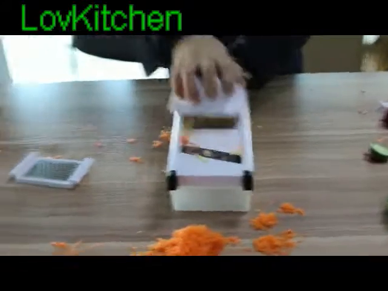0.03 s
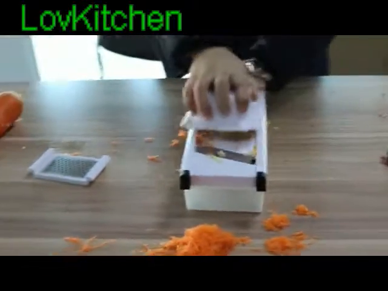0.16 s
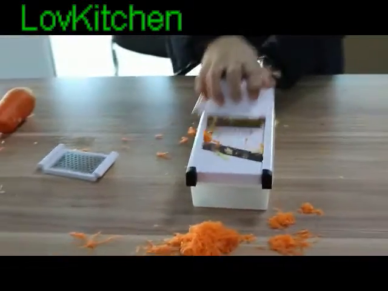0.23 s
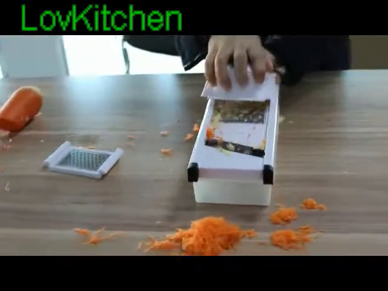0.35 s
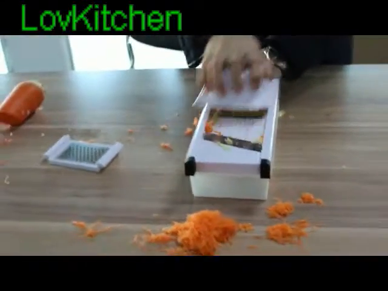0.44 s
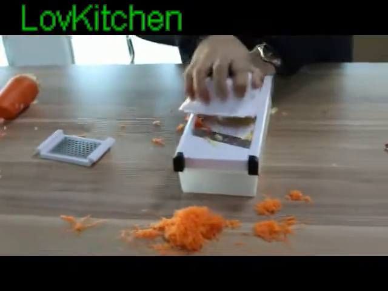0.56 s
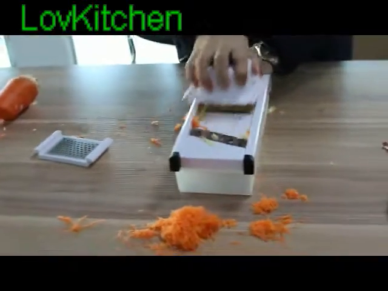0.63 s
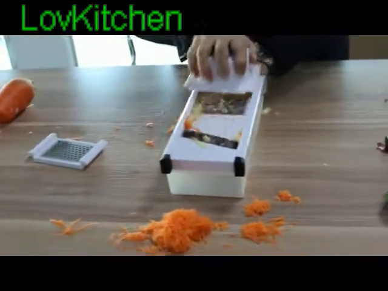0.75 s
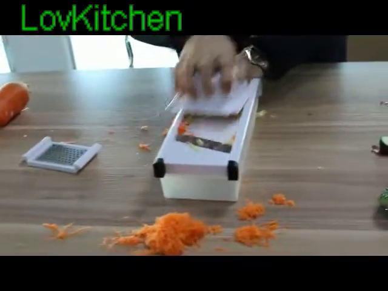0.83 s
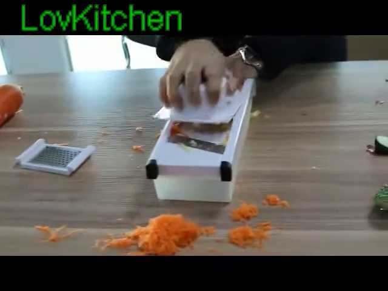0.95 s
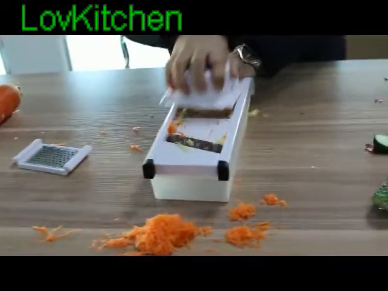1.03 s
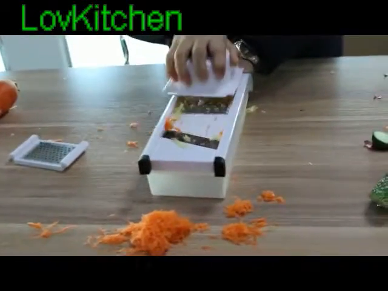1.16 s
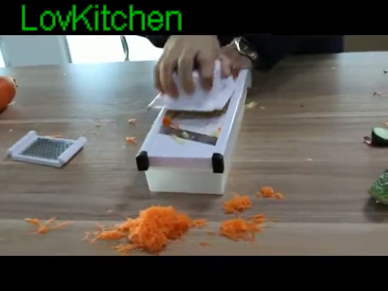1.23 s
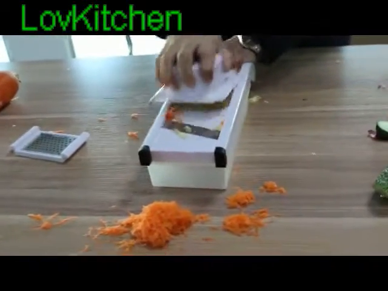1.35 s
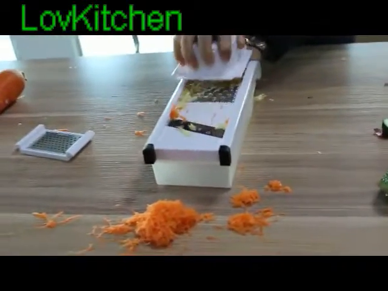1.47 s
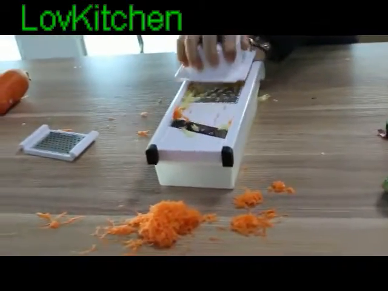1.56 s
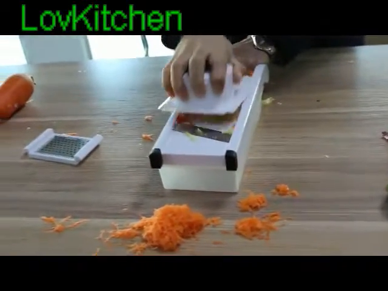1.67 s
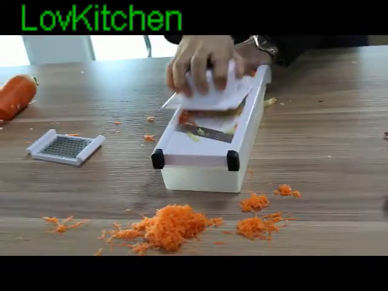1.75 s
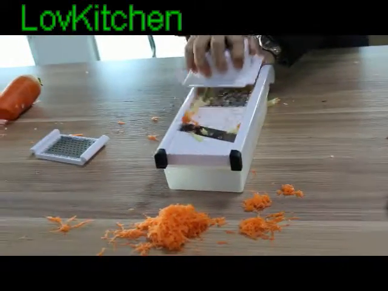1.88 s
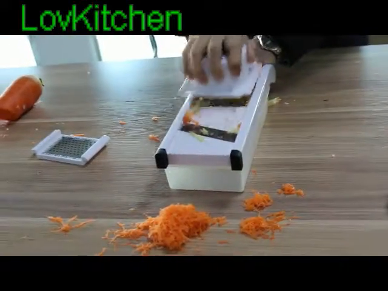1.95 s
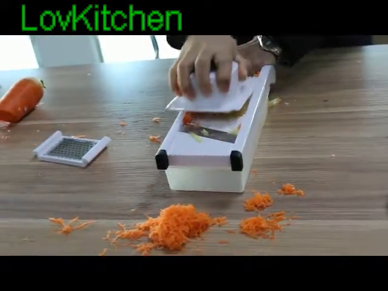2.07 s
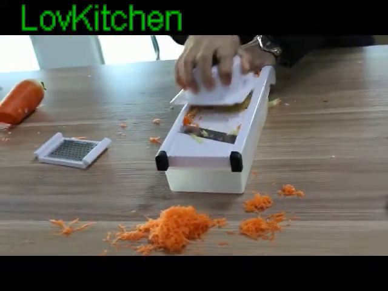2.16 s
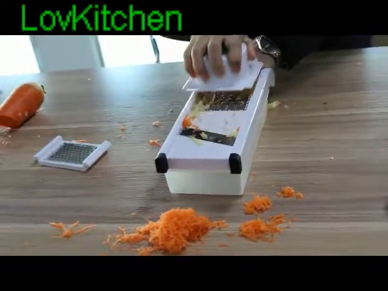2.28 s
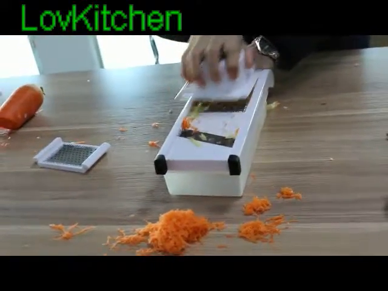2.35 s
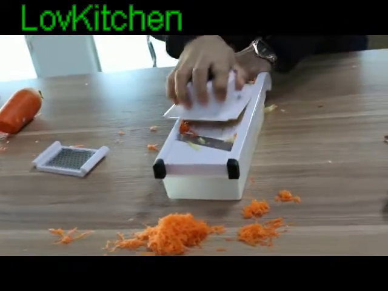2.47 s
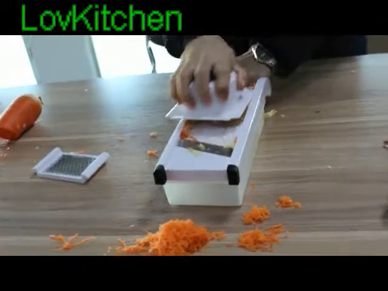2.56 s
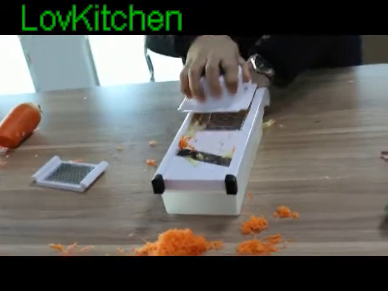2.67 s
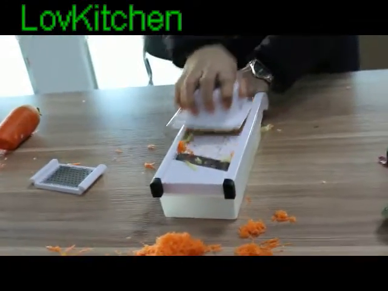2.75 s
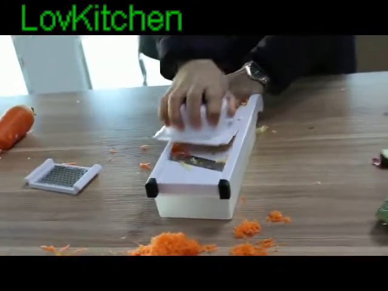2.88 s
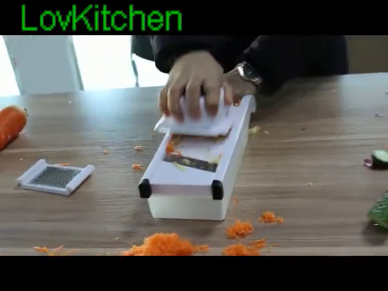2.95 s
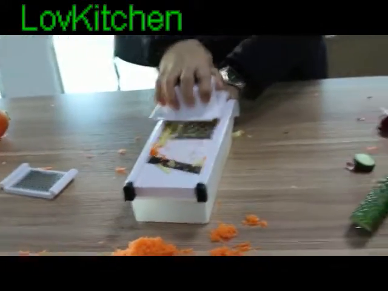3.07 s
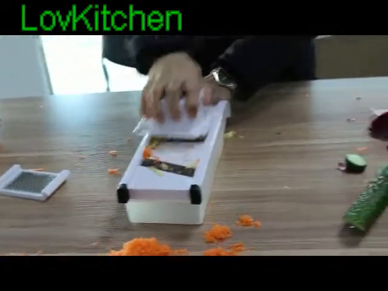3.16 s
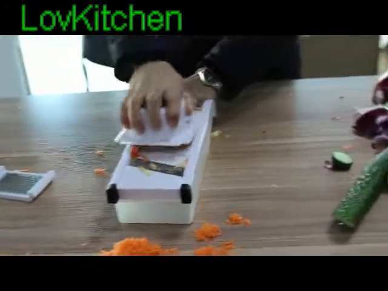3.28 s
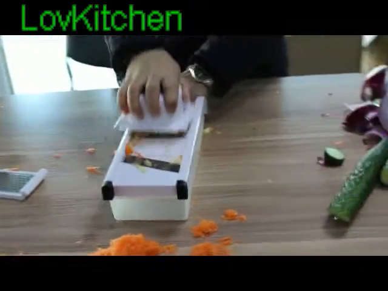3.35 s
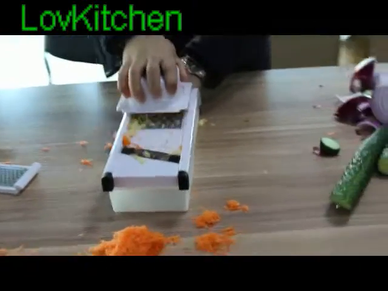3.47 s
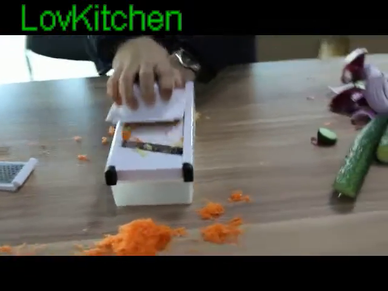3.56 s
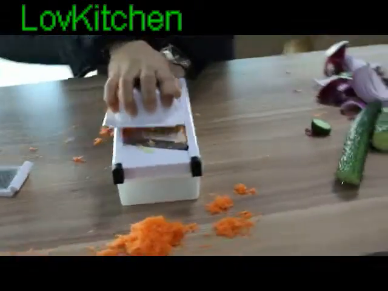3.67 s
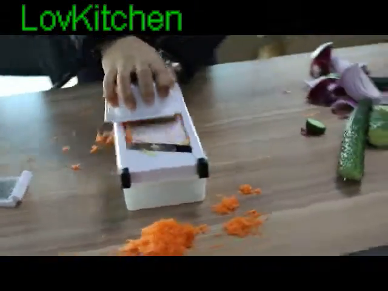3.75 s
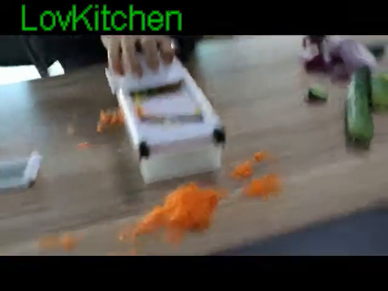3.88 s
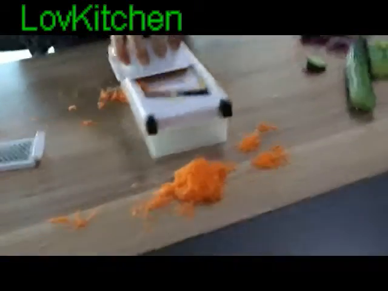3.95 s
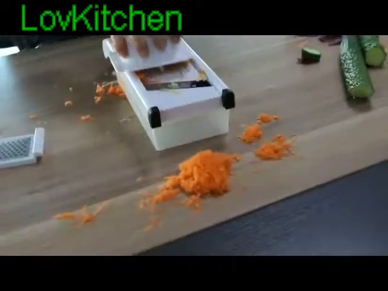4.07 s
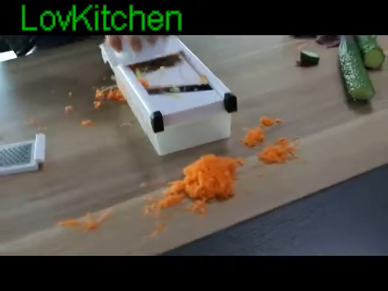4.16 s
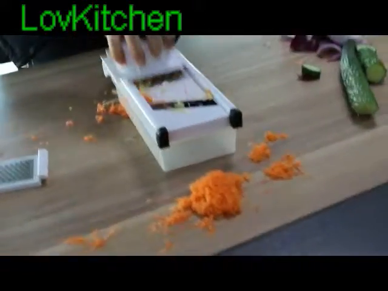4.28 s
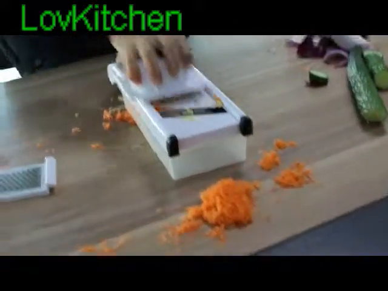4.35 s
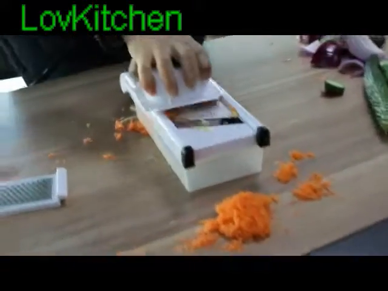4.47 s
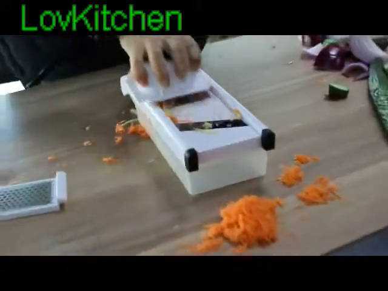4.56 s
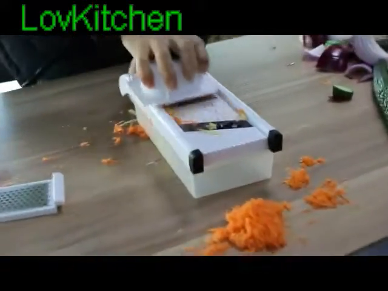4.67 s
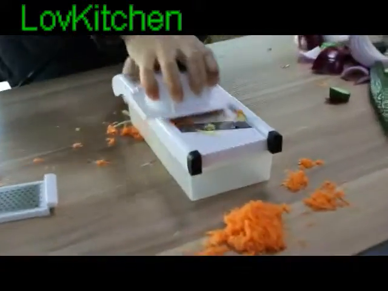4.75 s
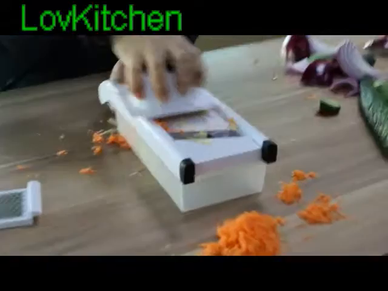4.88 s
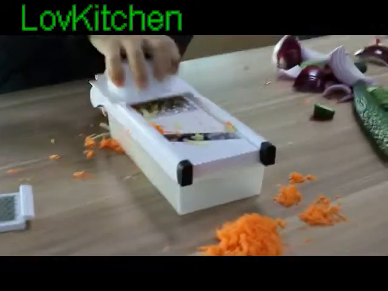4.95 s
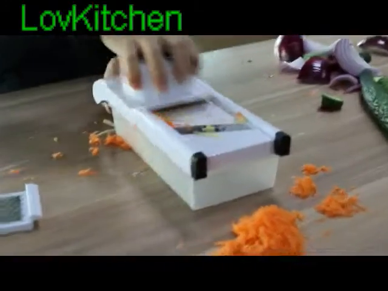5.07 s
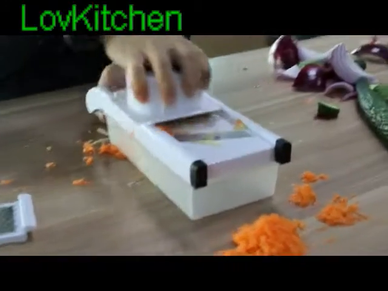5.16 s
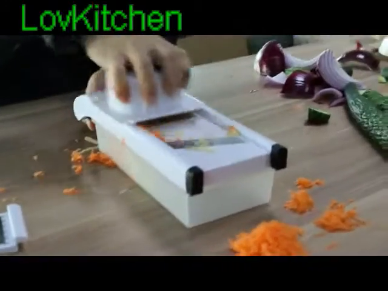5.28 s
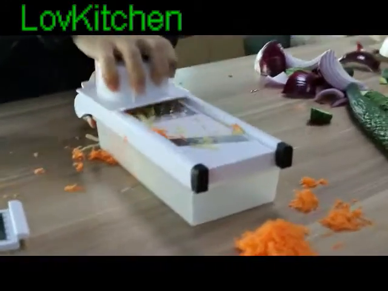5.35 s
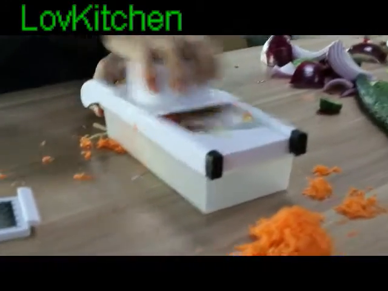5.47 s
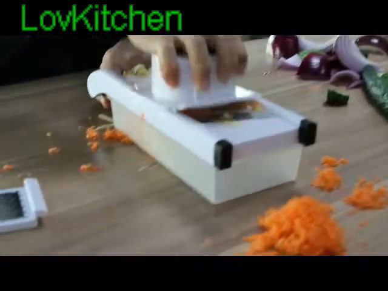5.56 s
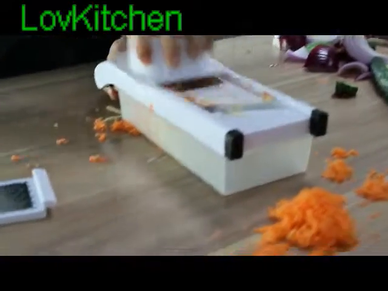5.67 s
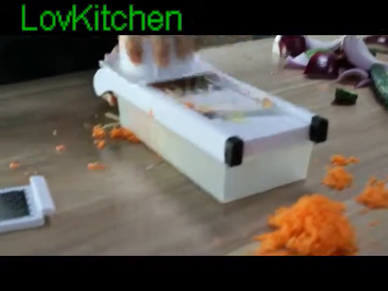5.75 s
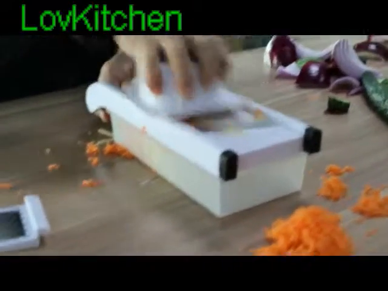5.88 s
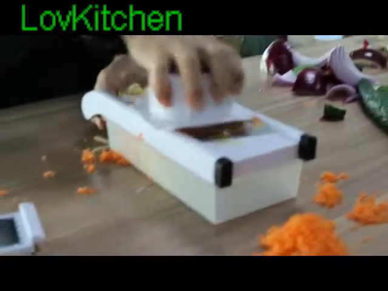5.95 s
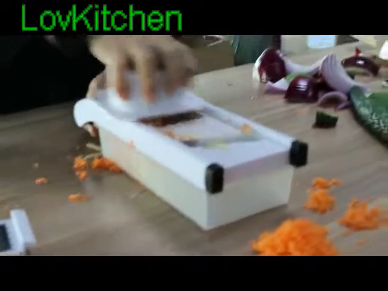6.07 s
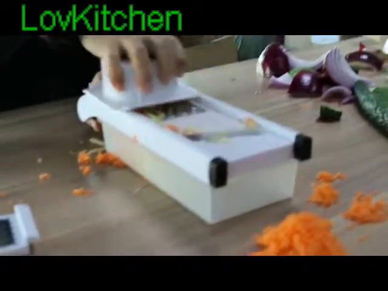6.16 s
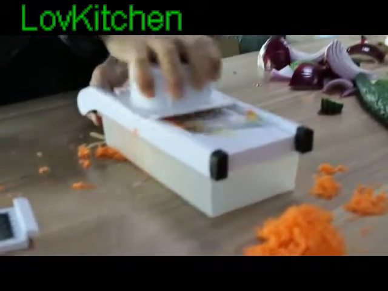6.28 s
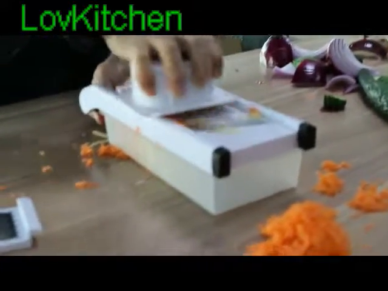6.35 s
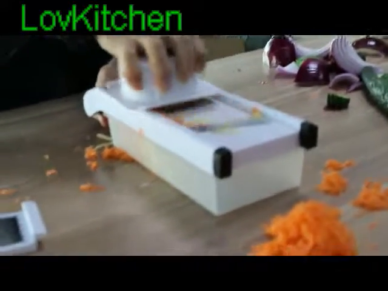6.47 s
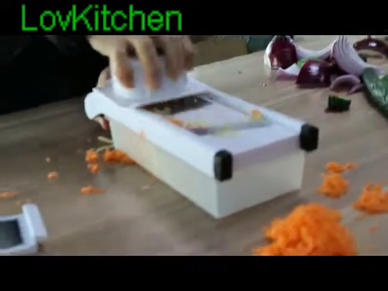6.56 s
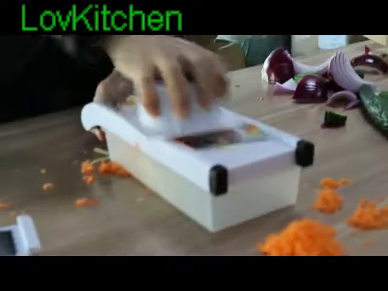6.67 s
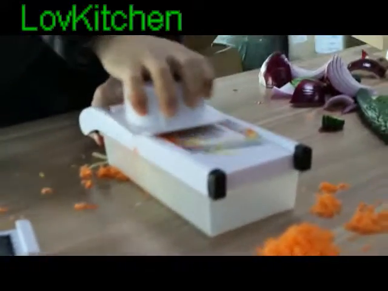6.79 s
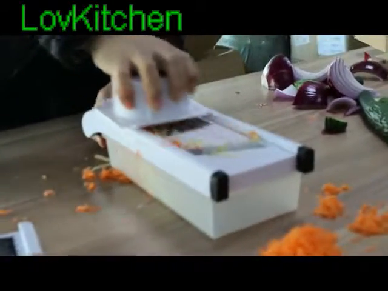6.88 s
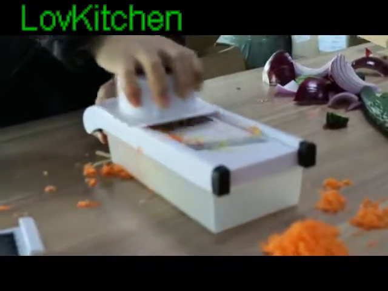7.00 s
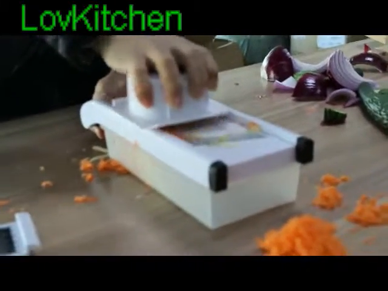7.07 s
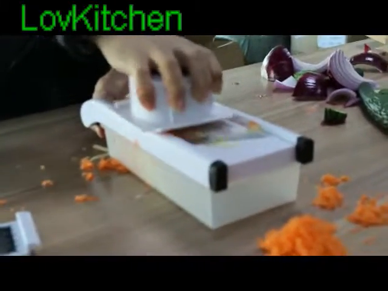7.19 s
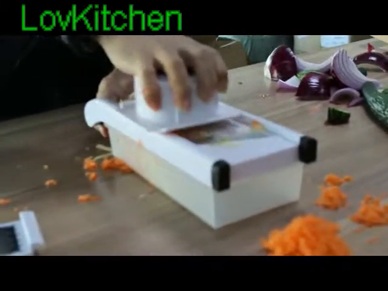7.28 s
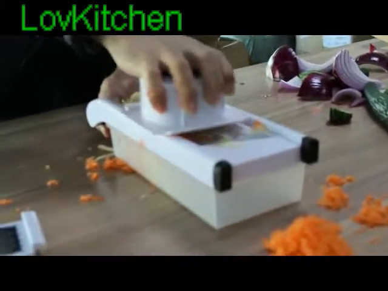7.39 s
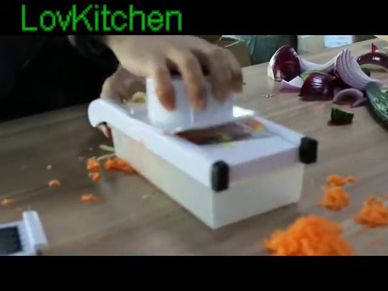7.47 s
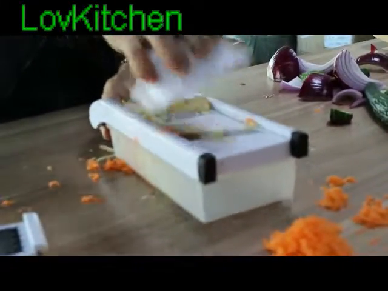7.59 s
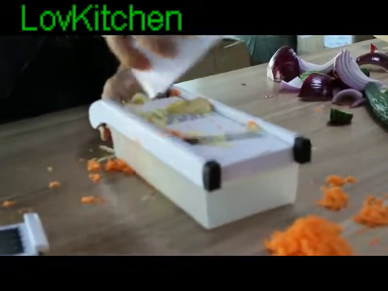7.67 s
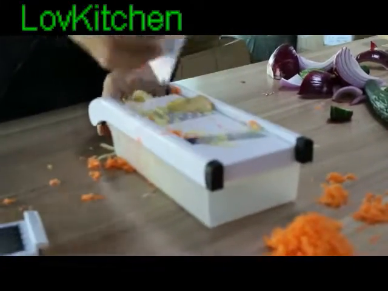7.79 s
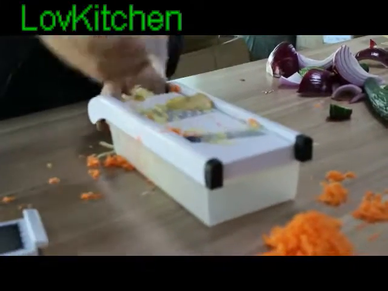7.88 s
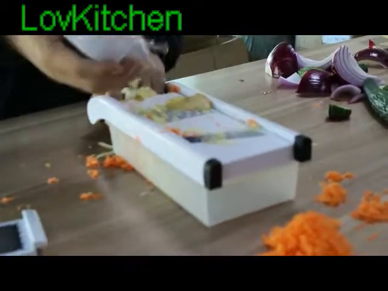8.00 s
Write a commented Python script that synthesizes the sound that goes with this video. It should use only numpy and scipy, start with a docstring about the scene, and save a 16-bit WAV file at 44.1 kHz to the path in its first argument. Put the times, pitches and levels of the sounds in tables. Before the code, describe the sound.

From the start, a potato held in a plastic guard is pushed back and forth over the toothed blade of a plastic slicer box on a wooden table, heard close. Each push is a bright, crunchy, slightly wet rasp, and each pull back is a lighter, duller plastic rub. The pushes come evenly, between two and three a second. At many turns the guard knocks the hollow box with a small rattle, with heavier thuds at about 0.2, 1.0, 2.6, 3.7 and 4.5 seconds. From about 5.3 seconds the strokes become less even and the clacks crowd together. The scraping fades by about 6.7 seconds with a couple of small snaps. After a short pause, one louder hollow knock comes at about 7.2 seconds and hums briefly. The bare room adds a short echo, and a faint distant rumble continues until the end at about 8 seconds.

```python
"""A potato in a plastic guard is pushed to and fro over the toothed blade of a plastic slicer box on a wooden table.
The teeth tear the flesh with a bright rasp, the guard rubs on the rails, and it knocks the hollow box at the turns.
A bare, echoing room answers; a distant rumble lies under all."""
import sys
import numpy as np
from scipy import signal
from scipy.fft import rfft, irfft, next_fast_len
from scipy.io import wavfile
from scipy.ndimage import map_coordinates

SR = 44100
rng = np.random.default_rng(int(sys.argv[2]) if len(sys.argv) > 2 else 0)


def unload_audio(sound):
    """Save the sound as a 16-bit wav file, at the path given as the first command line argument."""
    columns = np.transpose(np.atleast_2d(sound))
    # keep every value between -1 and 1, then stretch to whole-number steps
    steps = np.round(np.clip(columns, -1, 1) * 32767)
    wavfile.write(sys.argv[1], SR, steps.astype(np.int16))


N = 354117

KNOCKS = [(0.228, 2.5, 397, -24.5), (0.313, -10, 720, -12), (0.445, -21, 730, -4), (0.69, -9.5, 855, -2), (1.008, 2.5, 398, -20),
          (1.255, -14, 721, -29.5), (1.468, -8, 645, 0), (1.614, -7, 706, -12),
          (1.771, -4, 300, -41.5), (2.219, -19, 736, -16), (2.564, 4.5, 407, -19.5),
          (2.93, -5, 339, -21.5), (3.019, -16, 620, 5), (3.037, -6.5, 644, -16),
          (3.21, -8, 610, 0), (3.569, -13.5, 636, 2.5), (3.697, 4.5, 408, -20.5),
          (3.807, -13, 730, 0.5), (3.976, -12.5, 503, 0), (4.184, -14, 296, -22), (4.331, -8.5, 537, -8),
          (4.353, -7.5, 645, -6), (4.463, 3.5, 392, -19), (4.721, -25, 900, 3),
          (4.771, -19, 623, -8), (4.850, -21.5, 700, -6), (4.915, -14, 575, -2), (5.099, -8.5, 567, -4.5), (5.107, -11, 550, 2),
          (5.326, -3.5, 710, -3.5), (5.478, -6, 603, -12.5), (5.509, -5.5, 613, -3),
          (5.696, -5, 335, -26), (5.744, -10, 705, -29), (5.902, -8.5, 483, -6.5), (6.105, -8.5, 550, -13),
          (6.11, -5, 610, 0), (6.204, -0.5, 586, -16), (6.276, -7.5, 490, -1),
          (6.577, -21, 710, -6), (6.645, -13.5, 634, -14.5), (7.168, 6.5, 416, -22.5)]  # (s, level dB, centre of the thud Hz, hardness dB)
# box and table top: (Hz, dB, t60 s)
BOX = [(144, 3.5, 0.054), (220.7, 10, 0.088), (335, 7, 0.031), (407, 7.5, 0.028), (465.6, 5.5, 0.027), (570, 10.5, 0.022), (752, 9, 0.025),
       (1013, 7.5, 0.028), (1310, -15, 0.02), (2080, -3.5, 0.0089), (2290, 0.5, 0.0028), (4110, -13, 0.0073)]
TEAR = [(710, -7.5), (1200, -10.5), (1830, -3.5), (2120, -1.5), (3840, -2.5), (5240, -6), (9480, -11.5), (13000, -20.5),
        (15700, -31)]  # (Hz, dB per Hz)
RUB = [(59, -55), (100, -33.5), (216, 0), (276, -11), (315, -7), (779, -4), (855, -3), (1290, -3.5), (9000, -26),
       (11700, -120)]  # (Hz, dB per Hz)
RUMBLE = [(20, -32), (37, -6), (59, 0), (81, -0.5), (171, -2.5), (396, -11.5), (618, -9.5), (711, -14),
          (1210, -13.5), (15700, -43)]  # (Hz, dB per Hz)
RUMBLE_DB = -40.5
RUMBLE_ALIKE = [(60, 1), (380, 0.91), (2380, 0.42), (15000, 0.047)]  # (Hz, left-right likeness)
ROOM = [(120, 0.32), (600, 0.41), (5000, 0.52), (12000, 0.29)]  # (Hz, t60 s)
ROOM_ALIKE = [(200, 0.99), (1000, 0.89), (3000, 0.55), (8000, 0.12)]  # (Hz, left-right likeness)
TOP_HZ = 15830  # fixed
NEAR_ALIKE = [(500, 1), (3000, 0.88), (9000, 0.78)]  # the rasp itself: (Hz, left-right likeness)
SLOWING_DB, SLOWING_BEND = 30, 0.99  # level lost over the slowing time; over 1 the loss starts gently
TEAR_GROWS, RUB_GROWS = 1, 0.87  # how steeply each sound follows the speed of the hand
RUB_LEAD_S = 0.0037  # the guard is already dragging when the teeth bite
# a cutting push and a lighter pull back in turn: (start s, time to full speed s, time to slow down s, tearing dB, rubbing dB)
STROKES = [(-0.05, 0.052, 0.44, -35.5, -31), (0.242, 0.097, 0.15, -23.5, -25), (0.42, 0.091, 0.096, -37.5, -33), (0.599, 0.13, 0.078, -23.5, -25),
           (0.79, 0.079, 0.15, -41, -35), (1.05, 0.062, 0.13, -24, -24), (1.22, 0.068, 0.084, -36, -30.5), (1.376, 0.12, 0.15, -24.5, -24),
           (1.606, 0.019, 0.11, -32.5, -22), (1.815, 0.085, 0.11, -24.5, -25.5), (1.97, 0.086, 0.23, -42, -36), (2.181, 0.096, 0.14, -23.5, -26),
           (2.39, 0.067, 0.19, -37.5, -34.5), (2.57, 0.093, 0.14, -24.5, -26), (2.79, 0.064, 0.22, -40.5, -33.5), (2.955, 0.11, 0.11, -24.5, -26),
           (3.168, 0.041, 0.22, -31, -30), (3.325, 0.13, 0.084, -25, -26.5), (3.557, 0.021, 0.19, -31, -25.5), (3.715, 0.13, 0.099, -24.5, -25.5),
           (3.96, 0.037, 0.088, -30.5, -22.5), (4.081, 0.13, 0.077, -23.5, -25.5), (4.323, 0.04, 0.099, -33, -21.5), (4.467, 0.12, 0.086, -25.5, -27.5),
           (4.70, 0.067, 0.088, -44, -32), (4.854, 0.11, 0.044, -24.5, -26.5), (5.086, 0.031, 0.082, -31.5, -23.5), (5.228, 0.1, 0.13, -23.5, -26),
           (5.474, 0.024, 0.13, -33.5, -27.5), (5.615, 0.078, 0.13, -28, -29), (5.713, 0.034, 0.071, -22.5, -27.5), (5.898, 0.015, 0.067, -36.5, -25.5),
           (6.067, 0.073, 0.15, -26, -24.5), (6.268, 0.021, 0.09, -34, -31.5), (6.429, 0.064, 0.26, -29.5, -27.5)]
SNAPS = [(1.373, -31.5, 7000), (6.423, -28.5, 3000), (6.576, -29, 6000)]  # the teeth catch: (s, starting level dB, centre Hz)
SNAP_S = 0.031  # t60
SWELL_CYCLES = 0.46  # a mode needs this long to take up a soft blow
CAVITY_HZ, CAVITY_DB, CAVITY_T60_S, CAVITY_SWELL_S = 381.7, -19.5, 0.28, 0.026  # the air in the box hums on
LET_GO_S, LET_GO_DB = 7, 10  # with the guard at rest the air hums louder
RATTLE_S, RATTLE_DB = 0.012, -9.5  # the guard chatters after a blow, most after a soft one: mean gap, loss a contact
WEAR_PER_S = 0.2  # the plate rings less as shreds pile up on it
PLATE = [(284, 61, 5.5), (706, 180, -5.5), (2600, 490, -12), (3740, 120, -4)]  # the blade plate under the potato: (Hz, width Hz, dB)
CRUNCH_PER_S, CRUNCH_S, CRUNCH_DB, CRUNCH_HZ = 110, 0.0086, -2, 2460  # fibres that break together: rate, t60, size over the rasp, centre


def amp(db):
    """Gain of a level in dB."""
    return 10 ** (np.asarray(db) / 20)


def unit(x):
    """x at rms 1."""
    return x / np.sqrt(np.mean(x ** 2) + 1e-20)


def along(points, hz):
    """(Hz, value) points read on a log axis."""
    f, v = np.transpose(points)
    return np.interp(np.log(hz + 1), np.log(f + 1), v)


def wobble(rate):
    """A smooth random curve, rate knots a second."""
    return map_coordinates(rng.standard_normal(int(N * rate / SR) + 4), [np.arange(N) * rate / SR])


def filtered(x, response):
    """x times a complex response of frequency."""
    m = next_fast_len(x.shape[-1] + 8192)  # fixed
    return irfft(rfft(x, m) * response(np.fft.rfftfreq(m, 1 / SR)), m)[..., :x.shape[-1]]


def spread(pair, alike):
    """Two unrelated signals mixed to left and right with a likeness by frequency."""
    turn = lambda hz: np.arccos(np.clip(along(alike, hz), -1, 1)) / 2
    mid, side = filtered(pair, lambda hz: np.array([np.cos(turn(hz)), np.sin(turn(hz))]))
    return np.array([mid + side, mid - side])


def grit(share, spread_db, hiss):
    """Two streams of tiny snaps on a share of the samples, some larger than the rest, over smooth hiss."""
    snaps = (rng.random(N) < share) * amp(spread_db * rng.standard_normal(N)) * rng.standard_normal((2, N))
    return unit(snaps) + hiss * rng.standard_normal((2, N))


def hollow(hz, widen):
    """The walls of the box as resonances; a rubbing hand damps them."""
    return sum((-1) ** k * amp(db) * 1j * hz * w / (c * c - hz * hz + 1j * hz * w)
               for k, (c, db, w) in enumerate((c, db, widen / t60) for c, db, t60 in BOX))


def strokes():
    """Cells burst on the teeth; the guard drags over the rails and shakes the box."""
    tear_db, rub_db = np.transpose(STROKES)[3:]  # fixed
    bursts = grit(.04, spread_db=3, hiss=1.6)  # fixed
    wet = lambda hz: amp(-2.2 * np.log2((hz + 1) / CRUNCH_HZ) ** 2)
    tear = filtered(bursts + filtered(crunch() * bursts, wet), lambda hz: amp(along(TEAR, hz)))
    rub = filtered(grit(0.055, spread_db=2.5, hiss=0.9), lambda hz: amp(along(RUB, hz)) * (0.46 + 0.63 * hollow(hz, widen=4.06)))
    tear = level(tear_db, TEAR_GROWS, lead_s=0, wobble_db=2.0, rate=30) * unit(tear) + catches(bursts)
    rub = level(rub_db, RUB_GROWS, RUB_LEAD_S, wobble_db=-1.0, rate=120) * unit(rub)
    return spread(pressed(tear + rub), NEAR_ALIKE)


def knocks():
    """Each blow rings the modes around its centre, low ones swelling later; a hard one adds the high modes and a plastic clack."""
    out, t = np.zeros(N + SR), np.arange(SR // 2) / SR
    hz, level_db, t60 = np.transpose(BOX)[:, :, None]
    high, lowest = hz > 1300, hz < 170  # fixed
    edge = signal.butter(2, [900, 3000], "band", fs=SR)  # fixed
    chance_db = 1.5 * rng.standard_normal((len(KNOCKS), len(BOX), 1))  # fixed
    hum = amp(CAVITY_DB - 60 * t / CAVITY_T60_S) * (1 - np.exp(-t / CAVITY_SWELL_S)) * np.sin(2 * np.pi * CAVITY_HZ * t)
    for (s, db, centre_hz, hard_db), luck_db in zip(KNOCKS, chance_db):
        near = lambda f: amp((hard_db - 8.5) * np.log2(f / centre_hz) ** 2)  # a long, soft contact picks out fewer modes
        table = -amp(-.45 * hard_db - 14.5 - 4.6 * (s > LET_GO_S)) * lowest  # a soft, heavy blow pushes the table top down
        reach = near(hz) + table + amp(hard_db * np.minimum(hz, 2300) / 1600 + 0.0) * high
        swell = (1 - np.exp(-t * hz / (SWELL_CYCLES * 2 ** (-hard_db / 18)))) ** 2
        ring = reach * swell * amp(level_db + luck_db - 60 * t / t60) * np.sin(2 * np.pi * hz * (1 + 0.031 * luck_db[::-1]) * t)
        air = near(CAVITY_HZ) * amp(LET_GO_DB * (s > LET_GO_S)) * hum
        shell = signal.butter(3, [700, 4700 * 2 ** (np.clip(hard_db + 10, -15, 0) / 9)], "band", fs=SR)  # soft contact is duller; fixed
        clack = signal.lfilter(*shell, amp(0.39 * hard_db + 7.0 - 60 * t / 0.034) * rng.standard_normal(len(t)))
        clack += signal.lfilter(*edge, amp(0.67 * hard_db + 14.0 - 60 * t / 0.007) * rng.standard_normal(len(t)))  # first touch of the edges
        blow = ring.sum(0) + amp(-4.0) * clack
        later = (np.cumsum(RATTLE_S * rng.uniform(.5, 1.5, size=3)) * SR).astype(int)
        blow = blow + (s < LET_GO_S) * sum(amp(RATTLE_DB * (k + 1) - 0.29 * (hard_db + 20)) * np.pad(blow, (d, 0))[:len(t)] for k, d in enumerate(later))
        out[round(s * SR):][:len(t)] += amp(db - 6.5) * (blow + air)
    return out[:N]


def room(x, build_s):
    """Echoes gather for a moment, then each frequency dies at its own speed; every stretch meets new echoes."""
    out, hop = np.zeros((2, N + 2 * SR)), SR // 4
    for start in range(0, N, hop):
        hz, t, z = signal.stft(rng.standard_normal((2, SR // 2)), SR, nperseg=256)
        shape = amp(-60 * t / along(ROOM, hz)[:, None]) * (1 - np.exp(-(t / build_s) ** 2))
        tail = spread(signal.istft(z * shape, SR, nperseg=256)[1], ROOM_ALIKE)
        wet = signal.fftconvolve(x[None, start:start + hop], tail / np.linalg.norm(tail[0]), axes=1)
        out[:, start:start + wet.shape[1]] += wet
    return out[:, :N]


def rumble():
    """Far traffic and air in the room, swelling a little."""
    pair = filtered(rng.standard_normal((2, N)), lambda hz: amp(along(RUMBLE, hz)))
    return amp(RUMBLE_DB + 0.43 * wobble(1.14)) * unit(spread(pair, RUMBLE_ALIKE))


def level(peak_db, grows, lead_s, wobble_db, rate):
    """Gain of all strokes: the speed swells as a quarter sine and then dies away, with a quick unevenness."""
    power, t = np.zeros(N), np.arange(N) / SR + lead_s
    for (s, rise, fall, *_), db in zip(STROKES, peak_db):
        swell = np.sin(np.pi / 2 * np.clip((t - s) / rise, 0, 1))
        slowing = amp(-SLOWING_DB * (np.clip(t - s - rise, 0, None) / fall) ** SLOWING_BEND)
        power += (amp(db) * (swell * slowing) ** grows) ** 2
    return np.sqrt(power) * amp(wobble_db * wobble(rate))


def catches(bursts):
    """Short bursts where the teeth catch and let go."""
    t = np.arange(N) / SR
    thin = lambda centre_hz: unit(filtered(bursts, lambda hz: amp(-7 * np.log2((hz + 1) / centre_hz) ** 2)))
    return sum(amp(db - 60 * np.clip(t - s, 0, None) / SNAP_S) * (t >= s) * thin(hz) for s, db, hz in SNAPS)


def plate(hz):
    """The blade plate lifts its resonances out of the scraping."""
    return 1 + sum(amp(db) * 1j * hz * w / (c * c - hz * hz + 1j * hz * w) for c, w, db in PLATE)


def crunch():
    """Gain that jumps where fibres break together and dies at once."""
    breaks = (rng.random(N) < CRUNCH_PER_S / SR) * rng.exponential(size=N)
    return amp(CRUNCH_DB) * signal.lfilter([1], [1, -amp(-60 / (CRUNCH_S * SR))], breaks)


def pressed(x):
    """The plate's resonances shift and fade as the hand moves along it."""
    low, high = filtered(x, lambda hz: plate(hz * 1.09)), filtered(x, lambda hz: plate(hz / 1.12))
    place, hold = 1 / (1 + np.exp(-2 * wobble(5))), 1 / (1 + np.exp(-1 - 2 * wobble(3)))  # fixed
    return x + hold * np.exp(-WEAR_PER_S * np.arange(N) / SR) * (place * high + (1 - place) * low - x)


def scene():
    """The slicer, its echoes and the background."""
    rasp, blows = strokes(), knocks()
    send = amp(-7.0) * rasp.mean(0) + amp(-5.0) * blows
    return rasp + blows + room(send, build_s=.021) + rumble()  # fixed


def record(dry):
    """The left port is a little weaker in the bass; peaks are rounded and nothing passes above the band limit."""
    lean = lambda hz: amp(np.array([[-.5], [.5]]) * along([(100, 1.2), (2000, 0.82), (6000, -0.3)], hz)) * (hz < TOP_HZ)
    rounded = dry / (1 + np.abs(dry) ** 6) ** (1 / 6)  # fixed
    return filtered(rounded, lean)


dry = scene()
out = record(dry)
unload_audio(out)
```